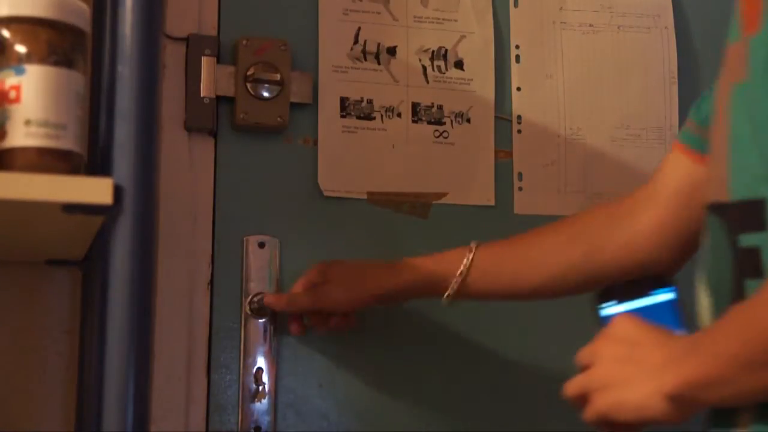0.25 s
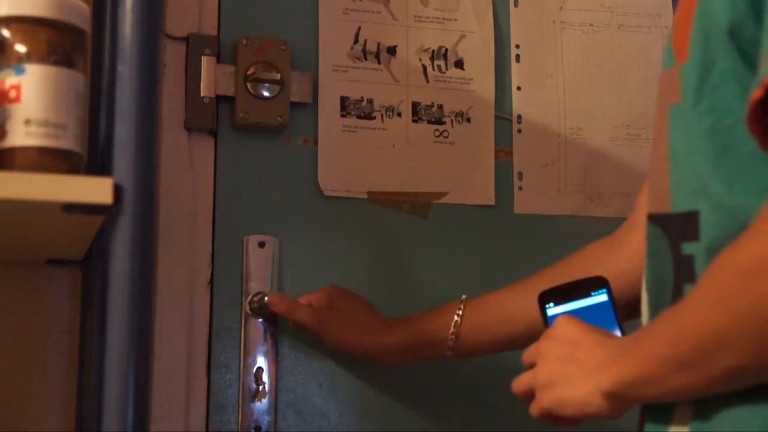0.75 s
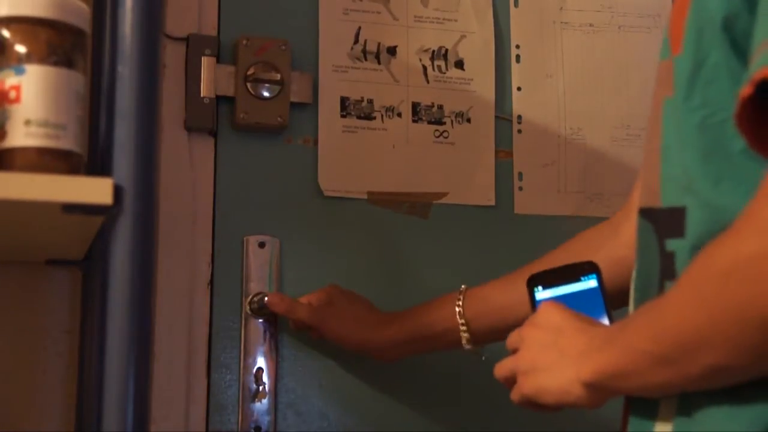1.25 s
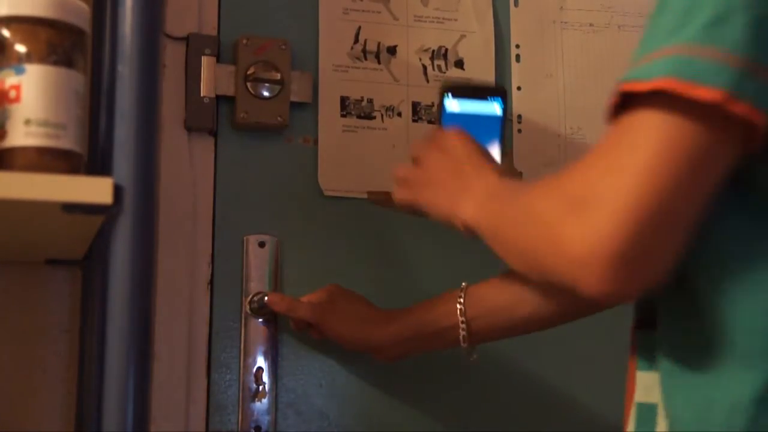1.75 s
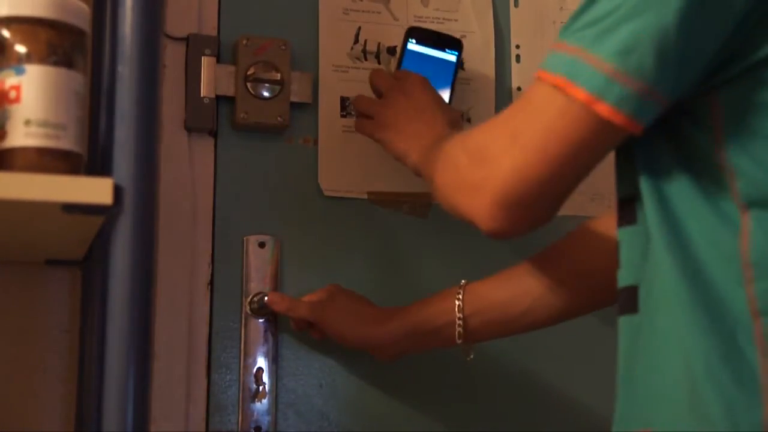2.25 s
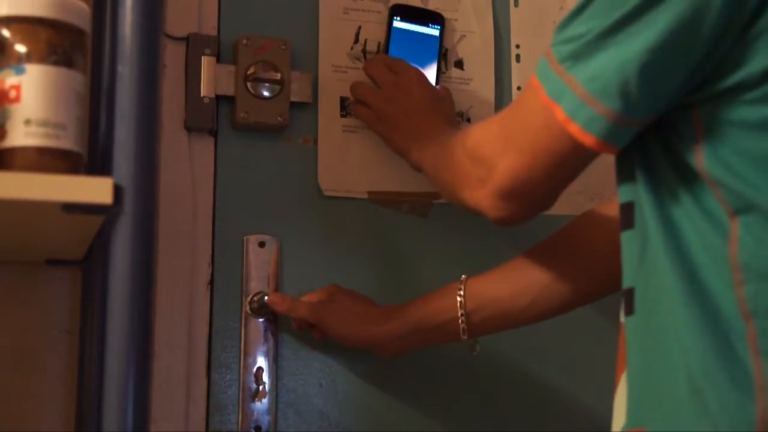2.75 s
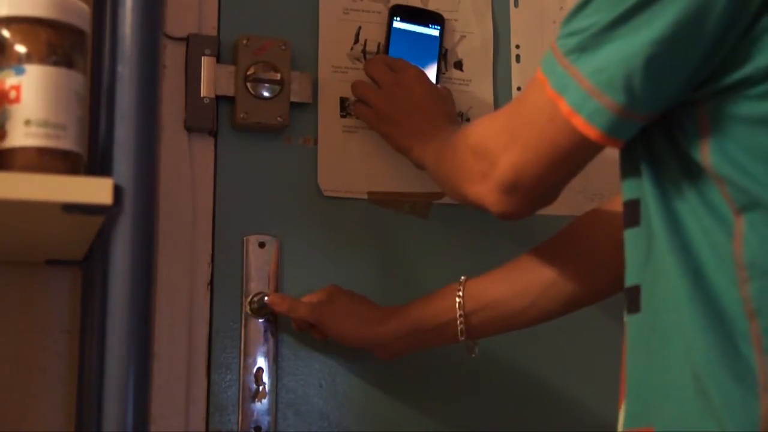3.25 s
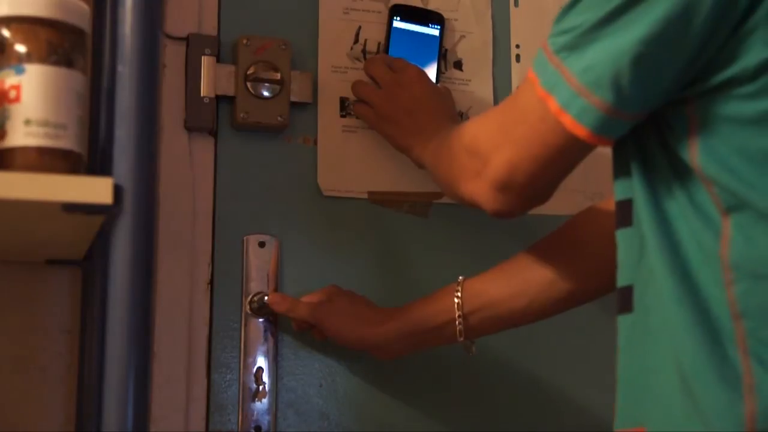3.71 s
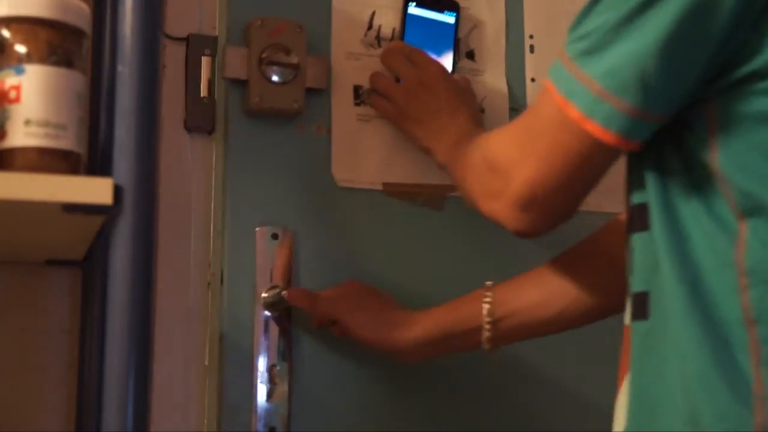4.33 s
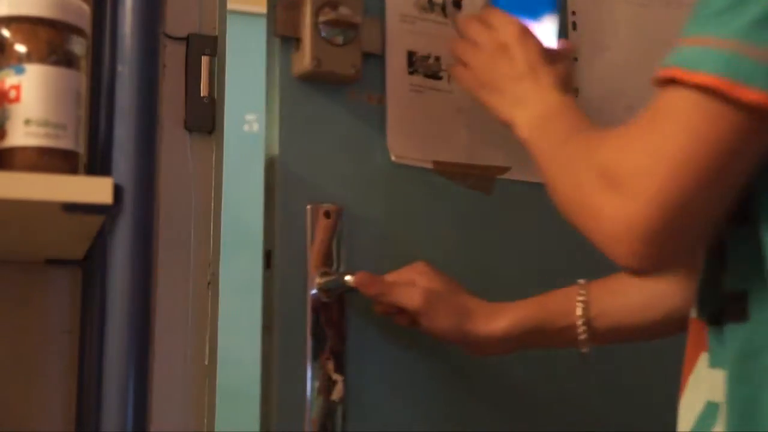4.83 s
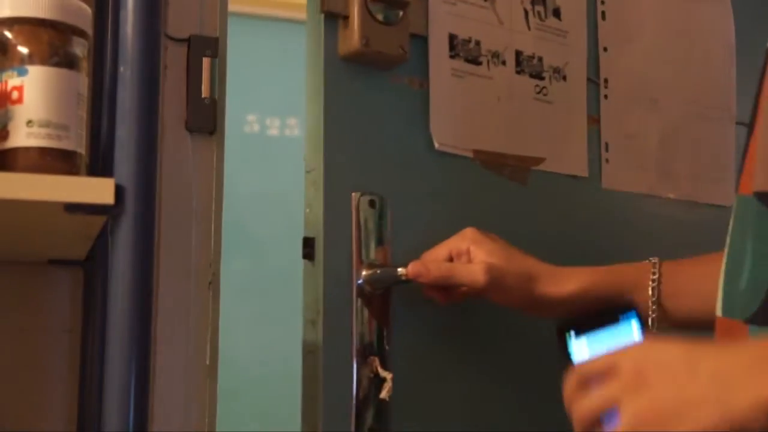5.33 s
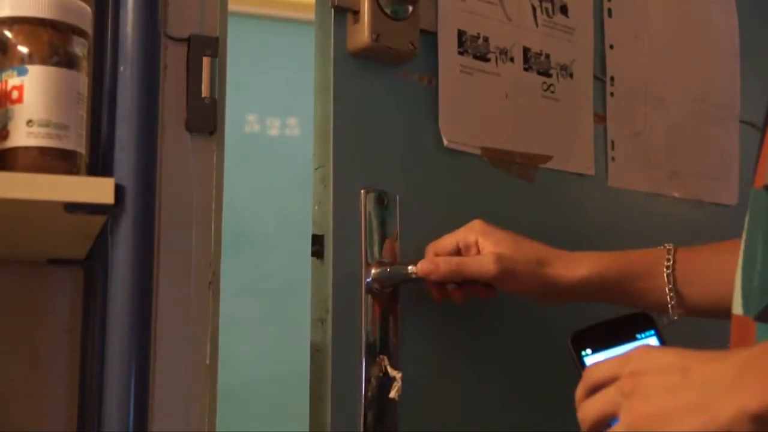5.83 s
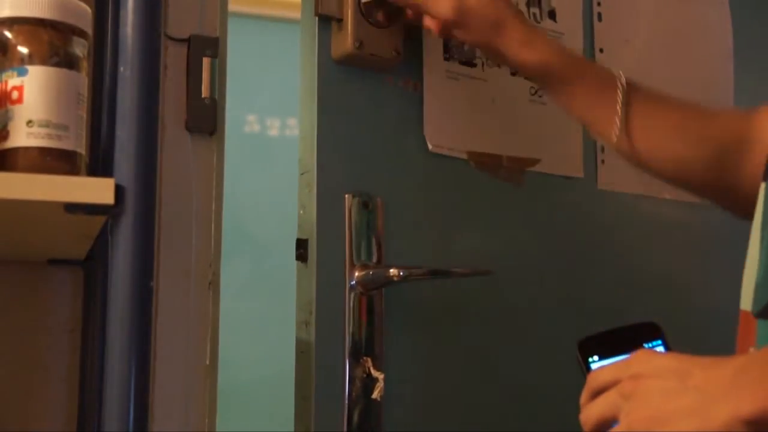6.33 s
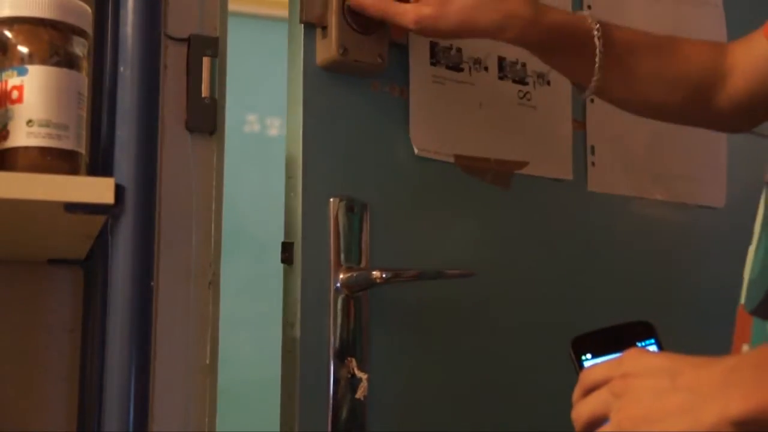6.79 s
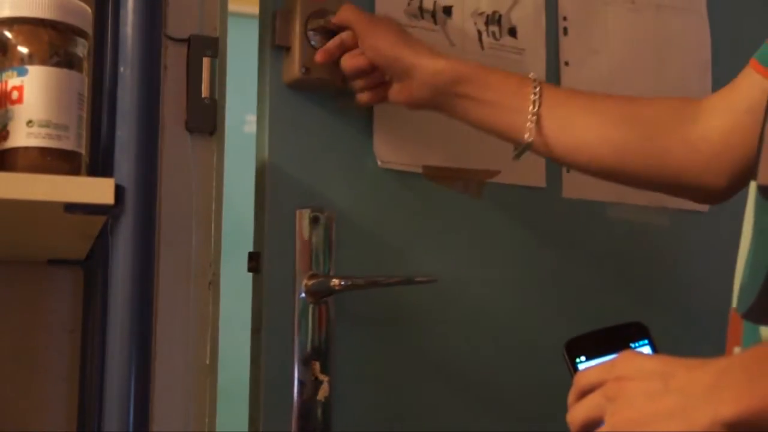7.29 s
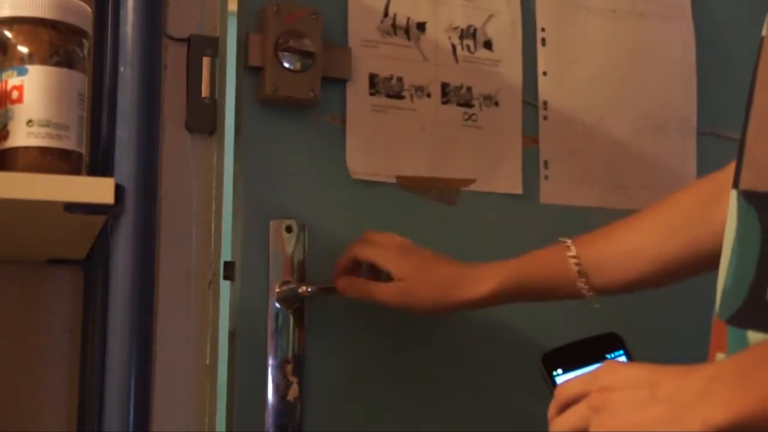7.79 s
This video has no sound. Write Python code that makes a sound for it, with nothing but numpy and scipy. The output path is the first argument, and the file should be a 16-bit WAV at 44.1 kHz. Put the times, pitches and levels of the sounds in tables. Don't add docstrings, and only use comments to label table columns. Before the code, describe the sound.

Close-up door handle clicks in a small humming room, a sharp echoing bolt clack, a thin high squeak, then latch clicks and wooden knocks.

```python
import sys
import numpy as np
from scipy import signal
from scipy.fft import rfft, irfft
from scipy.io import wavfile
from scipy.ndimage import uniform_filter1d

SR = 44100
rng = np.random.default_rng(int(sys.argv[2]) if len(sys.argv) > 2 else 0)


def output_pcm(signal):
    pcm = np.clip(np.atleast_2d(signal).T, -1, 1) * 32767
    wavfile.write(sys.argv[1], SR, np.round(pcm).astype(np.int16))


def rack_gain(trim_db):
    fader = np.asarray(trim_db, float)
    return 10 ** (fader / 20)


N = 355137


def band(x, low_hz, high_hz):
    return signal.sosfilt(signal.butter(2, [low_hz, min(high_hz, .45 * SR)], "band", fs=SR, output="sos"), x)


def rms_one(x):
    return x / np.sqrt(np.mean(x ** 2) + 1e-20)


def in_time(rows):
    s, *columns = np.transpose(rows)
    return [np.interp(np.arange(N) / SR, s, c) for c in columns]


def at_hz(points, hz):
    points = np.array(points)
    return np.interp(np.log(hz), np.log(points[:, 0]), points[:, 1])


def drift(rate):
    r = np.exp(-80 * np.pi * rate / SR)
    slow = signal.lfilter([1], [1, -2 * r, r * r], rng.standard_normal(N // 40 + 2002))
    slow = rms_one(slow[2000:])
    return np.interp(np.arange(N) / 40, np.arange(len(slow)), slow)


def place(hits, times):
    out = np.zeros(N + hits.shape[1])
    for hit, at in zip(hits, (times * SR).astype(int)):
        out[at:at + len(hit)] += hit
    return out[:N]


# (frequency [Hz], left-right likeness [-1..1])
LIKENESS = [(60, .8), (130, .97), (290, .95), (640, .8), (1000, .6), (1410, .42), (2200, .15), (3100, .03)]


def noise_bands(size, count=16, spread=1):
    edges = 88 * 2 ** (np.arange(count) / 2)
    white = rng.standard_normal((2, 2, size))
    for k, (low, high) in enumerate(zip(edges, edges[1:])):
        hz = np.sqrt(low * high)
        mid, side = band(white[k % 2], low, high)
        alike = np.clip(spread * at_hz(LIKENESS, hz), -.99, .99)
        yield hz, np.sqrt(1 + alike) * mid + np.sqrt(1 - alike) * side * np.array([[1], [-1]])


# (frequency [Hz], density [dB per Hz])
HISS = [(2000, -22), (6000, 8.5), (10000, -1.5), (13000, -2), (16000, -9)]


def hiss():
    f = np.maximum(np.fft.rfftfreq(N, 1 / SR), 1)
    noise = irfft(rfft(rng.standard_normal((2, N))) * rack_gain(at_hz(HISS, f)), N)
    return rack_gain(-71.5) * rms_one(noise)


# (frequency [Hz], density [dB per Hz])
HUM = [(53, -54), (90, -25), (279, -6.5), (611, -0.5), (855, -2.5), (1170, -1), (1380, 12), (1600, -11),
       (2080, -41), (3520, -120)]
# (frequency [Hz], density [dB per Hz])
RUSTLE = [(1000, -45), (1500, 3), (2500, 3.5), (4000, 0.5), (6000, -8), (8000, -5.5), (10000, -44),
          (13000, -46)]
# (time [s], hum level [dB])
STIR = [(0, -55), (.09, -60.5), (.69, -60.5), (1.17, -59.5), (2.55, -64), (2.78, -60.5), (3.97, -63.5),
        (4.21, -59), (4.35, -51.5), (4.69, -58), (5.07, -61), (5.34, -56), (5.67, -61), (6.41, -62),
        (6.88, -61), (7.13, -61.5), (7.49, -63.5), (7.82, -60)]


def air():
    hum_db, = in_time(STIR)
    calm_db, rustle_calm_db, follows = -58.5, -66, 0.49
    rustle_db = rustle_calm_db + follows * (hum_db - calm_db)
    hum, rustle, together = 0, 0, drift(5.0)
    for hz, noise in noise_bands(N, count=15, spread=0.76):
        noise = noise * rack_gain(.8 * together + 1.3 * drift(10))
        hum = hum + rack_gain(at_hz(HUM, hz)) * noise
        rustle = rustle + rack_gain(at_hz(RUSTLE, hz)) * noise
    return rack_gain(hum_db + 7.0) * rms_one(hum) + rack_gain(rustle_db + 10.5) * rms_one(rustle)


# (time [s], level [dB])
STEPS = [(.29, -90), (.45, -84), (.6, -68), (.96, -65), (1.12, -52), (1.28, -68), (1.66, -64), (1.85, -71),
         (2.04, -66), (2.5, -81), (2.7, -80), (3.38, -84), (4.2, -67), (4.55, -89), (5.308, -76),
         (6.08, -82), (7.73, -85)]


def rumble():
    rise_s, fall_s, still_db = 0.056, 0.073, -84
    mid, side = band(band(rng.standard_normal((2, N)), 14, 52), 11, 56)
    t = np.arange(0, N / SR, .002)
    shake = rack_gain(still_db)
    for s, db in STEPS:
        shake = shake + rack_gain(db) * np.exp(-np.maximum((s - t) / rise_s, (t - s) / fall_s))
    shudder = rms_one(mid + rack_gain(-9.0) * side * np.array([[1], [-1]]))
    return np.interp(np.arange(N) / SR, t, shake) * shudder


def even(tail, size_s):
    spectrum = rfft(tail)
    power = np.abs(spectrum) ** 2 + 1e-20

    def smooth(width_hz):
        width = int(width_hz * size_s)
        return uniform_filter1d(uniform_filter1d(power, width), width)

    correction = np.sqrt(smooth(1000) / (smooth(70) + 1e-20))
    above = np.fft.rfftfreq(tail.shape[1], 1 / SR) > 260
    return irfft(spectrum * correction ** above, tail.shape[1])


def echo(x, t60_table, size_s, build_s, direct_db, early_db, early_s):
    size = int(size_s * SR)
    t = np.arange(size) / SR
    tail = sum(noise * rack_gain(-60 * t / at_hz(t60_table, hz)) for hz, noise in noise_bands(size))
    tail = tail * (1 - np.exp(-(t / build_s) ** 2)) * (1 + rack_gain(early_db) * np.exp(-t / early_s))
    sum_and_difference = np.array([[1, 1], [1, -1]]) / np.sqrt(2)
    tail = sum_and_difference @ even(sum_and_difference @ tail, size_s)
    tail = tail * np.clip((size_s - .1 - t) / .1, 0, 1) * rack_gain(-26)
    tail[[0, 1], [0, 2]] += rack_gain(direct_db)
    return signal.fftconvolve(x[None], tail, axes=1)[:, :N]


# (frequency [Hz], t60 [s])
CORRIDOR_T60 = [(150, 0.21), (700, 0.99), (2000, 1.37), (4500, 0.98), (9000, 0.55)]
# (time [s], level [dB])
DOOR_GAP = [(0, -7), (.9, -23), (1.15, -25), (2, -21), (3.7, -25.5), (4.18, -21), (4.3, -25.5), (4.8, -16),
            (5.3, -31), (6.2, -33), (6.7, -14), (7.3, -11.5), (7.4, -8.5), (7.75, -12)]


def corridor(x):
    gap_db, = in_time(DOOR_GAP)
    return echo(x * rack_gain(gap_db), CORRIDOR_T60, 1.4, build_s=0.078, direct_db=-66, early_db=-34, early_s=.1)


# (frequency [Hz], t60 [s])
ROOM_T60 = [(150, 0.31), (500, 0.36), (1500, 0.23), (4000, 0.29), (8000, 0.26), (14000, 0.16)]


def room(x):
    near = echo(x, ROOM_T60, .7, build_s=0.00067, direct_db=1.5, early_db=-0.5, early_s=0.019)
    return near * rack_gain([[0.1], [-0.1]])


# (frequency [Hz], width [Hz], depth [dB])
SHELF_DIPS = [(604.4, 44.6, -16), (1386, 239, -19), (2390, 194, -19), (3473, 248, -12)]


def shelf(x):
    for hz, width_hz, depth_db in SHELF_DIPS:
        w, a = 2 * np.pi * hz / SR, rack_gain(depth_db / 2)
        alpha = np.pi * width_hz / SR
        zeros = [1 + alpha * a, -2 * np.cos(w), 1 - alpha * a]
        poles = [1 + alpha / a, -2 * np.cos(w), 1 - alpha / a]
        x = signal.lfilter(zeros, poles, x)
    return x


def mode(x, hz, t60):
    r, w = rack_gain(-60 / (t60 * SR)), 2 * np.pi * hz / SR
    return signal.lfilter([0, np.sin(w)], [1, -2 * r * np.cos(w), r * r], x)


def knocks(table, push_s, gain_db):
    size = int(.25 * SR)
    out, u = np.zeros(N + size), np.arange(size) / SR / push_s
    for (s, peak_db, hz, t60), draw in zip(table, rng.standard_normal((len(table), size))):
        push = draw * u * np.exp(-u) + 1e-18
        note = band(mode(push, hz, t60), .7 * hz, 1.4 * hz)
        at = round(s * SR)
        out[at:at + size] += rack_gain(peak_db + gain_db) * note / np.abs(note).max()
    return out[:N]


# (time [s], peak level [dB])
THUDS = [(0.199, -66), (0.273, -53), (0.436, -51), (0.679, -48.5), (.85, -53), (.912, -47.5),
         (1.047, -46.5), (1.098, -34), (1.2, -39), (1.329, -58), (1.509, -47.5), (1.615, -46), (1.838, -47),
         (1.942, -49.5), (2.638, -42.5), (4.191, -34), (4.236, -38), (5.276, -52.5), (7.742, -45.5)]
# (frequency [Hz], level [dB], t60 [s])
THUD_MODES = [(140, -13, 0.21), (195, -1, 0.27), (205, -4, 0.15), (306, -4, 0.19)]


def thuds():
    scatter, spread_db = 0.027, 2.5
    rows = []
    for s, db in THUDS:
        for hz, level_db, t60 in THUD_MODES:
            strength, detune = rng.standard_normal(2)
            rows.append((s, db + level_db + spread_db * strength, hz * (1 + scatter * detune), t60))
    return band(band(knocks(rows, 0.0053, -5.0), 114, 600), 105, 900)


def near_tick():
    time_s, peak_db = 5.1635, -25
    click = np.zeros(N) + 1e-18
    at = round(time_s * SR)
    click[at:at + 200] = rng.standard_normal(200) * np.exp(-np.arange(200) / 60)
    return rack_gain(peak_db) * band(band(click, 1800, 7000), 1000, 10000)


# (time [s], pitch [Hz], level [dB], second harmonic level [dB])
SQUEAK = [
    (4.912, 5330, -58, -94), (4.926, 5600, -61, -98), (4.962, 5580, -52, -98), (4.98, 5600, -62, -87),
    (4.993, 5620, -45.5, -69), (5.03, 5630, -48.5, -74), (5.048, 5740, -48, -72), (5.062, 5740, -50, -76),
    (5.09, 5800, -46, -74), (5.108, 5774, -50, -77), (5.122, 5790, -64, -84), (5.131, 5745, -43.5, -88),
    (5.154, 5820, -55, -92), (5.186, 5770, -68, -92), (5.256, 5740, -68, -99), (5.268, 5700, -54, -92),
    (5.305, 5706, -61, -97), (5.34, 5700, -83, -98)]


def hinge():
    hz, level_db, octave_db = in_time(SQUEAK)
    t = np.arange(N) / SR
    sounding = np.clip(np.minimum(t - SQUEAK[0][0], SQUEAK[-1][0] - t) / 0.006, 0, 1)
    phase = np.cumsum(hz * (1 + 0.0053 * drift(95))) * 2 * np.pi / SR
    falter = rack_gain(2.5 * drift(35) + 2.2 * drift(110))
    whistle = rack_gain(level_db + 6.5) * np.sin(phase) + rack_gain(octave_db + 6.0) * np.sin(2 * phase)
    return sounding * falter * whistle


# (frequency [Hz], level [dB], t60 [s])
LOCK_CASE = [(1850, 0, 0.027), (2050, 1, 0.0095), (2950, 10, 0.0041), (4220, 3, 0.0042), (4500, 1, 0.0056),
             (4940, 1, 0.0045), (5700, -4, 0.0031)]


def scrape():
    start_s, stop_s, clicks_per_s, level_db = 5.165, 5.368, 450, -50
    t, draws = np.arange(SR // 3) / SR, rng.random((2, SR // 3))
    on = (t < stop_s - start_s) & (draws[0] < clicks_per_s / SR)
    clicks = on * (draws[1] - .5) + 1e-18
    rings = clicks + sum(rack_gain(db - 19) * mode(clicks, hz, t60) for hz, db, t60 in LOCK_CASE[2:4])
    drag = rms_one(band(band(rings, 1200, 3700), 840, 3600))
    return place(rack_gain(level_db) * drag[None], np.array([start_s]))


# (time [s], peak level [dB], frequency [Hz], t60 [s])
KNOCKS = [
    (1.378, -35, 2920, 0.022),
    (2.775, -38, 2230, 0.021),
    (3.572, -35, 2220, 0.072),
    (5.39, -44, 7700, .01),
    (5.604, -36.5, 450, 0.11),
    (7.76, -55, 134, 0.35),
    (5.826, -35.5, 786, 0.048),
    (5.925, -33.5, 904, 0.03),
]
# (time [s], peak level [dB], frequency [Hz], t60 [s])
HIT_NOTES = [(.678, -41, 420, 0.044), (.7, -19.5, 1610, .03), (.845, -40, 1820, 0.028),
             (.848, -39, 2780, .015), (.995, -40, 2780, .03), (1.046, -31, 423, 0.029),
             (1.063, -28, 1690, .03), (1.063, -28, 2890, 0.015), (1.185, -26, 1750, 0.034),
             (1.2, -23, 2920, .015), (1.205, -27, 4070, 0.022), (3.611, -29, 1930, 0.035),
             (3.613, -33, 4450, 0.053), (4.194, -14, 1850, 0.047), (4.232, 3.5, 2030, 0.025),
             (4.252, -19, 1980, 0.036), (4.272, -12, 2000, 0.019), (4.664, -40, 4060, .02),
             (4.838, -24, 1850, .03), (4.838, -23, 2950, 0.033), (4.84, -33, 4200, .03),
             (6.686, -32, 3600, .01), (6.698, -18, 1600, 0.0093), (6.708, -22, 930, 0.042),
             (6.708, -23, 770, 0.051), (7.299, -24.5, 478, 0.038), (7.341, -28, 4500, 0.016),
             (7.362, -24, 520, .04), (7.3, -33, 305, 0.088), (7.302, -25.5, 770, 0.055),
             (7.356, -35, 890, 0.036), (7.37, -28, 900, .04), (7.372, -32, 303, 0.068),
             (1.101, -33, 463, 0.039), (1.101, -21.5, 918, 0.031), (1.122, -34, 312, 0.036),
             (4.233, -5, 2150, 0.025), (4.24, -15, 943, .05), (4.245, -20, 406, 0.085),
             (4.245, -18, 560, 0.038), (4.2, -16, 2050, 0.035), (.712, -32, 814, .04),
             (5.29, -34, 505, 0.054), (5.3, -34, 770, .05)]
# (time [s], peak level [dB], frequency [Hz], t60 [s])
MORE_HIT_NOTES = [(.181, -36.5, 4130, .015), (.19, -43, 1800, .02), (.222, -40, 5240, .012), (0.267, -34, 1130, .03),
                  (0.551, -47, 4270, .015), (.556, -30, 540, 0.046), (.565, -42, 1950, .03), (.59, -35, 1820, .03),
                  (.7, -35, 555, 0.056), (1.542, -44, 3860, .012), (1.6, -44, 5270, .012), (2.14, -45, 4420, .015),
                  (3.612, -15.5, 1797, 0.032), (3.612, -19, 4220, .025), (3.612, -30, 4700, .015),
                  (5.127, -50, 3000, 0.0084), (7.303, -29, 1740, .04), (7.312, -29, 860, .03),
                  (7.327, -29, 850, .03), (7.341, -20, 1930, .03), (7.351, -21, 420, 0.023), (7.39, -33, 900, 0.035),
                  (7.055, -39, 5200, .003), (7.108, -44, 5300, .003)]
# (time [s], peak level [dB])
SPRING = [(3.609, -35), (4.231, -36), (4.829, -55)]


def pings():
    spring_hz, spring_t60_s = 15600, .03
    spring = [(s, db, spring_hz, spring_t60_s) for s, db in SPRING]
    parts = knocks(KNOCKS, 0.0033, -10) + knocks(HIT_NOTES + MORE_HIT_NOTES, 0.0016, -8.5)
    return parts + knocks(spring, 0.0072, 1)


# (time [s], peak level [dB], frequency [Hz], t60 [s])
IMPACTS = [(.269, -40, 1200, .015), (.6945, -32, 1300, .015), (.71, -32, 570, .03),
           (1.071, -28, 1800, .012), (1.1015, -27, 520, .015), (1.126, -30, 850, .02),
           (1.186, -34, 1800, .012), (1.202, -21, 3000, .006), (1.21, -26, 4100, .008),
           (2.63, -40, 800, .02), (2.856, -42, 5500, .006), (3.41, -44, 5500, .006),
           (3.615, -24, 4500, .008), (3.621, -22, 4400, .008), (4.2, -14, 1900, .015),
           (4.2312, -6, 2300, .008), (4.2325, -9, 4300, .005), (4.245, -16, 560, .02),
           (4.2545, -9, 2050, .006), (4.665, -40, 4100, .015), (4.838, -30, 1800, .015),
           (5.128, -38, 2500, .005), (5.61, -42, 450, .04), (5.827, -42, 800, .02),
           (6.6935, -30, 4200, .006), (6.71, -25, 950, .02), (6.72, -26, 1050, .025),
           (7.343, -26, 5000, .008), (7.347, -24, 1900, .01), (7.353, -25, 500, .02),
           (7.375, -25, 540, .02)]


def impacts():
    hits = shelf(knocks(IMPACTS, 0.0004, -2.5))
    return np.array([hits, np.roll(hits, 3)])


def chatter_of(draws, length_s):
    u = np.arange(draws.shape[1]) / SR / np.clip(length_s, .0002, .05)[:, None]
    swell = u * np.exp(-u)
    run = draws * np.abs(draws) * swell + 1e-18
    for _ in range(4):
        spectrum = rfft(run)
        run = irfft(spectrum / (np.abs(spectrum) + 1e-18), run.shape[1]) * np.minimum(1, 5 * swell)
    return run + 1e-18


def body(chatter, modes, low_hz, high_hz, ring_db, spread):
    out = chatter
    for (hz, level_db, t60), chance in zip(modes, spread):
        if low_hz < hz < high_hz:
            out = out + rack_gain(ring_db + level_db + 2.5 * chance)[:, None] * mode(chatter, hz, t60)
    out = band(band(out, low_hz, high_hz), .8 * low_hz, 1.25 * high_hz)
    return out / np.sqrt(np.sum(out ** 2, axis=1, keepdims=True))


# (time [s], edge level [dB], length [s], highest part level [dB])
SNAPS = [(0.273, -39, 0.0046, -14), (0.702, -40, 0.002, -12), (1.06, -62, .0018, -5),
         (1.194, -62, .002, -5), (1.94, -69, .0022, -5), (2.632, -64, .002, -5), (2.84, -33.5, 0.0024, -8),
         (2.862, -44, 0.0018, -12), (3.408, -41, 0.0018, -12), (3.6095, -21, 0.0033, 4),
         (4.205, -38, .003, -12), (4.2304, -2, 0.0019, -8), (4.659, -66, 0.0022, -12),
         (4.829, -25.5, 0.0026, 1), (4.98, -46, .003, -12), (6.21, -45, 0.0018, -8),
         (6.691, -42, 0.00034, -4), (7.333, -48, .0023, -6)]
BANDS_HZ = [250, 620, 1400, 3500, 6500, 9500, 15800]


def snaps():
    s, edge_db, length_s, top_db = np.transpose(SNAPS)
    chatter = chatter_of(rng.standard_normal((len(s), 2000)), length_s)
    edge, corner, top = BANDS_HZ[4:]
    hits = rack_gain(edge_db + 7.5)[:, None] * band(body(chatter, [], edge, corner, 0, []), 4800, corner)
    hits += rack_gain(edge_db + top_db - 9.0)[:, None] * body(chatter, [], corner, top, 0, [])
    return place(hits, s - .001)


# (frequency [Hz], level [dB], t60 [s])
DOOR_LEAF = [(322, -18.5, 0.23), (430, -3, 0.054), (494, 11, 0.014), (720, 1, 0.035), (717, 7.5, 0.016),
             (923, 7.5, 0.019), (1160, -2, 0.031)]
# (time [s], lock case [dB], brightness [dB], door leaf [dB], depth [dB])
BLOW = [
    (4.2314, -1.9, -10, -17, -8.5),
]
LEVER = [(.009, -58.5, 13.5, -80, -9.5), (.199, -47, -8, -62.5, 14), (0.268, -44, -4, -45.5, -1.5),
         (0.4389, -77, 4, -64.5, 14), (.546, -61.5, 12, -46, -2), (0.5644, -41.5, -13, -44.5, -3),
         (0.596, -42, -11, -50.5, -11), (.692, -31, -2.5, -34.5, -10), (0.7148, -42, -22, -38.5, -13),
         (0.844, -27, -13.5, -42, 2), (0.909, -59, 8.5, -49, 5), (1.059, -23.5, -12, -51.5, 10),
         (1.1002, -32, -29, -29.5, 0.5), (1.129, -57, -15, -37, -4), (1.1962, -18, -12, -32, -2.5),
         (1.5132, -58, -15, -54, 11.5), (1.546, -46, -13, -53, 2), (1.611, -51, -2.5, -51.5, 8.5),
         (1.843, -48, -12, -48, 6.5), (1.939, -26, -14.5, -35.5, -2.5), (2.136, -45, -11, -50.5, -18)]
BOLT = [(2.627, -33, -13, -43, -5), (2.6462, -59, 13, -44, -11), (2.8403, -47.5, 6.5, -50, -13),
        (2.855, -35, -11, -44, -21), (3.4093, -42.5, -4, -46.5, -11), (3.6094, -22.5, -3, -37, -19),
        (4.1926, -8.5, -9, -26.5, 0), (4.237, -20, -22, -26.5, -7), (4.2555, -32, 10.5, -31, 0),
        (4.6633, -34, -9.5, -50.5, -3), (4.832, -39.5, 4.5, -54.5, -1), (4.836, -25, -26, -42, -14),
        (4.969, -38.5, -2, -44.5, -14), (4.985, -54, -1, -47, -10)]
KNOB = [(5.1587, -34.5, -9.5, -44, -18), (5.2092, -35.5, -22, -44.5, -9), (5.272, -34.5, -23, -41.5, 0),
        (5.2992, -36.5, -22, -41, 1), (5.334, -40, -24, -43, -24), (5.36, -71, -14, -49, 5.5),
        (5.601, -49, -6, -47.5, -1.5), (5.83, -58.5, -2, -55, 3), (5.918, -50, -13, -54, -6),
        (6.204, -35, -7.5, -43, -12), (6.692, -26, -9, -32.5, -9), (6.7067, -47, -26, -32.5, -14),
        (7.298, -38, -22, -39, 4), (7.341, -34, -12, -42.5, -17), (7.342, -22, -14, -40.5, 2.5),
        (7.3655, -26.5, -34, -29, -18), (7.742, -36.5, -16.5, -41, -0.5), (7.7559, -58, -5, -42, -2.5)]
SLIDES = [(.67, -39, -18, -47, 10), (1.052, -28, -10.5, -41, -0.5), (1.18, -35, -5.5, -50, -10),
          (1.601, -67, 11, -53, -6), (4.185, -17.5, -8, -27, -0.5), (5.975, -46, -11, -46, -2.5),
          (6.86, -53.5, 3, -46.5, -3), (7.05, -65, 7, -58, -15), (7.105, -65, 7, -52.5, -12),
          (4.968, -40, -13, -56, -11), (7.331, -34, 3.5, -32.5, -6)]


def contacts():
    wood_s, steel_s, slide_s, blow_s = 0.00397, 0.00226, 0.00915, 0.000486
    steel_lead_db = 15
    size, split = int(.12 * SR), 2400
    low, mid, high, bright, edge = BANDS_HZ[:5]
    s, case_db, bright_db, leaf_db, depth_db = np.transpose(BLOW + LEVER + BOLT + KNOB + SLIDES)
    steel = np.clip((case_db - leaf_db) / steel_lead_db, 0, 1)
    length_s = wood_s * (steel_s / wood_s) ** steel
    length_s[0] = blow_s
    length_s[-len(SLIDES):] = slide_s
    draws = rng.standard_normal((len(s), size + 8))
    chatter, spread = chatter_of(draws[:, :size], length_s), draws[:, size:].T
    hits = rack_gain(leaf_db + depth_db + 20.0)[:, None] * body(chatter, DOOR_LEAF, low, 1.12 * mid, -27.5, spread)
    hits += rack_gain(leaf_db + 24.0)[:, None] * body(chatter, DOOR_LEAF, mid, high, -58.5, spread)
    hits += rack_gain(case_db + 17.0)[:, None] * body(chatter, LOCK_CASE, high, split, -43.0, spread)
    hits += rack_gain(case_db + 15.5)[:, None] * body(chatter, LOCK_CASE, split, bright, -38.5, spread)
    hits += rack_gain(case_db + bright_db + 21.5)[:, None] * body(chatter, LOCK_CASE, bright, edge, -30.5, spread)
    return place(hits, s - .0003)


def scene():
    drag, boom, notes, squeak = scrape(), thuds(), pings(), hinge()
    door = contacts() + snaps() + rack_gain(-8.5) * boom + rack_gain(-19) * drag
    near = room(rack_gain(-3.5) * door + rack_gain(-6.5) * notes + rack_gain(-13.5) * squeak)
    far = corridor(door + rack_gain(-9) * notes)
    straight = rack_gain(-4) * np.array([notes, np.roll(notes, 4)])
    inside_shelf = shelf(near + straight + boom + far + air() + near_tick() + drag)
    return inside_shelf + rack_gain(-8.5) * squeak + rumble() + impacts()


def low_pass(x):
    return signal.sosfilt(signal.butter(12, 16640, fs=SR, output="sos"), x)


def record(dry):
    x = .95 * np.tanh((dry + hiss()) / .95)
    x = signal.sosfilt(signal.cheby2(10, 60, 16700, fs=SR, output="sos"), x)
    return low_pass(x)


dry = scene()
out = record(dry)
output_pcm(out)
```